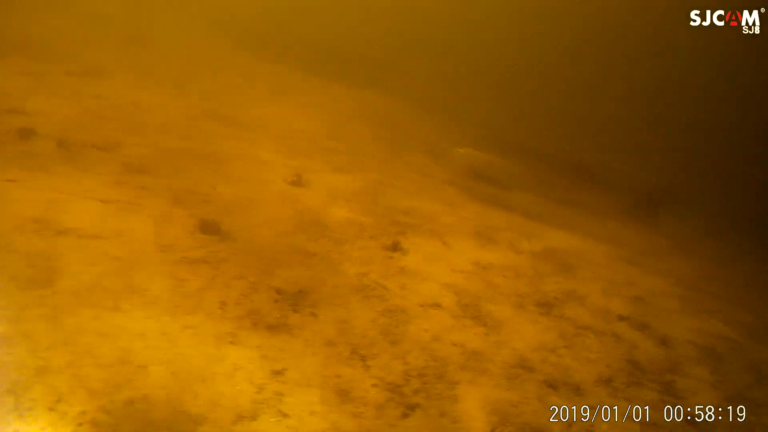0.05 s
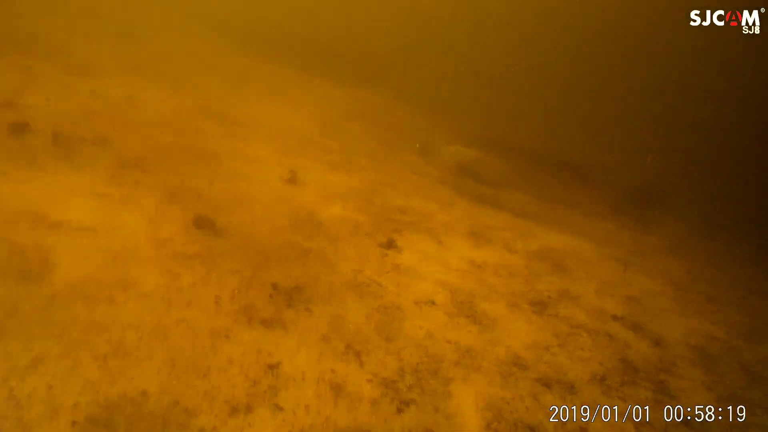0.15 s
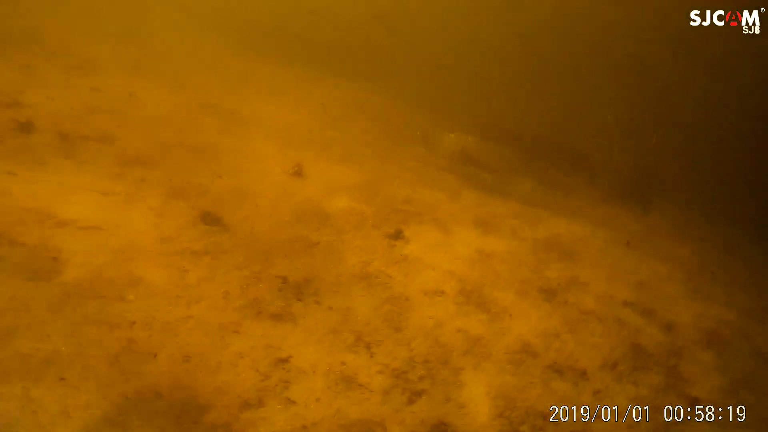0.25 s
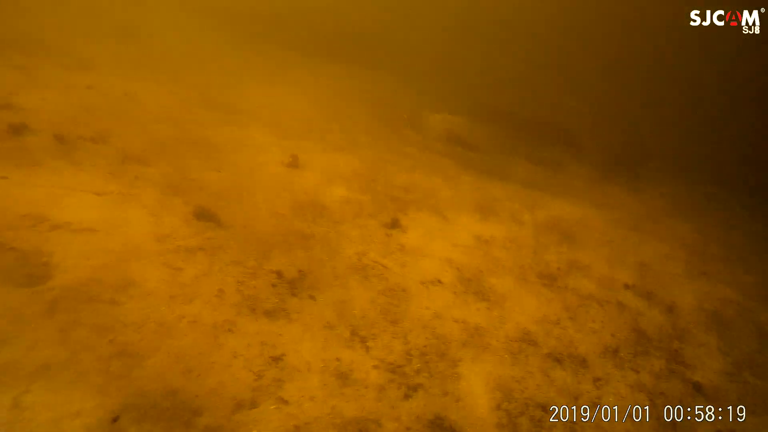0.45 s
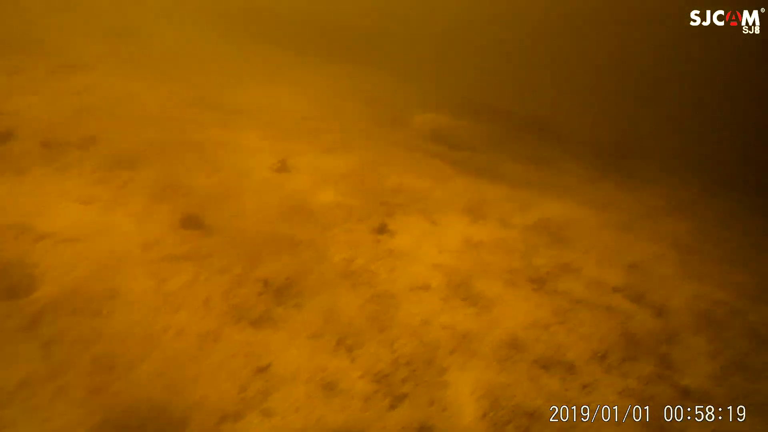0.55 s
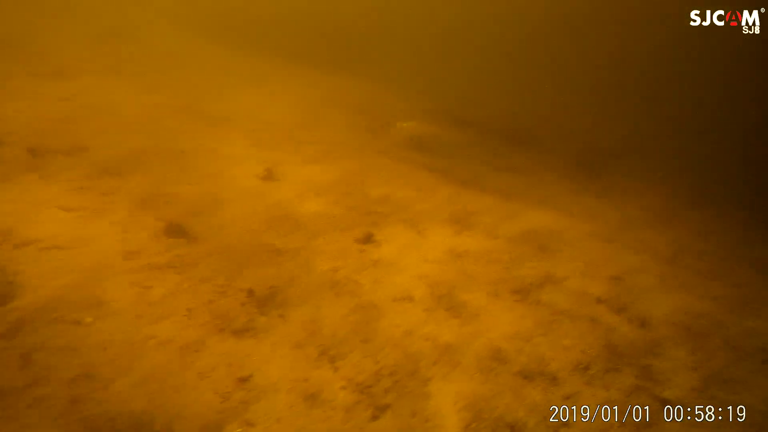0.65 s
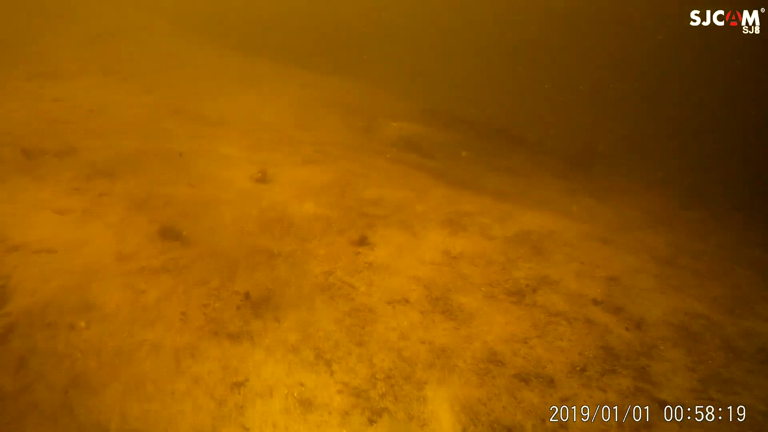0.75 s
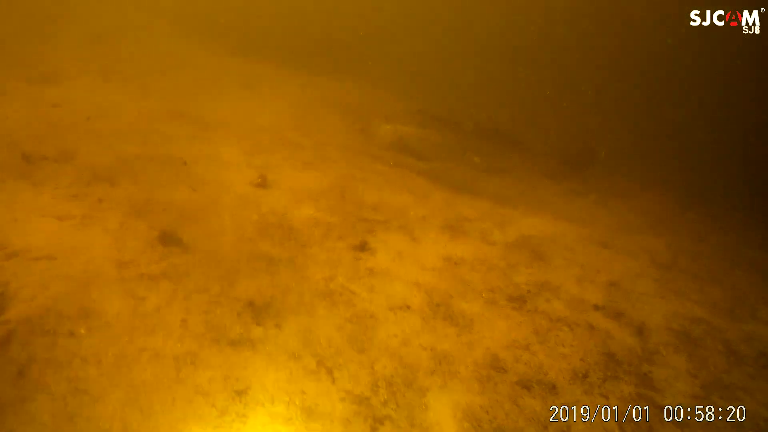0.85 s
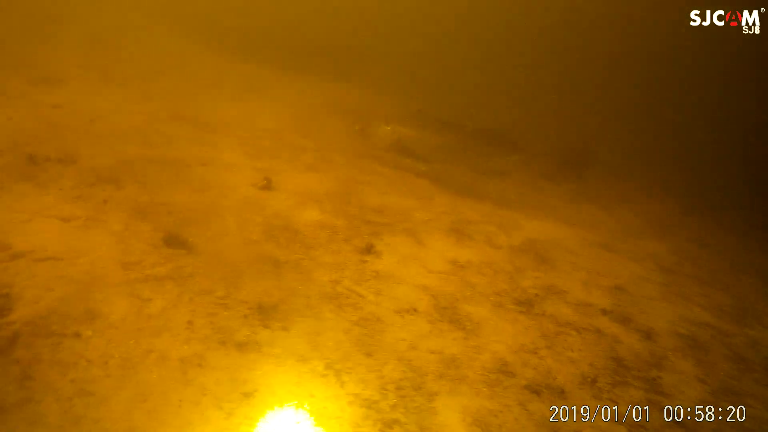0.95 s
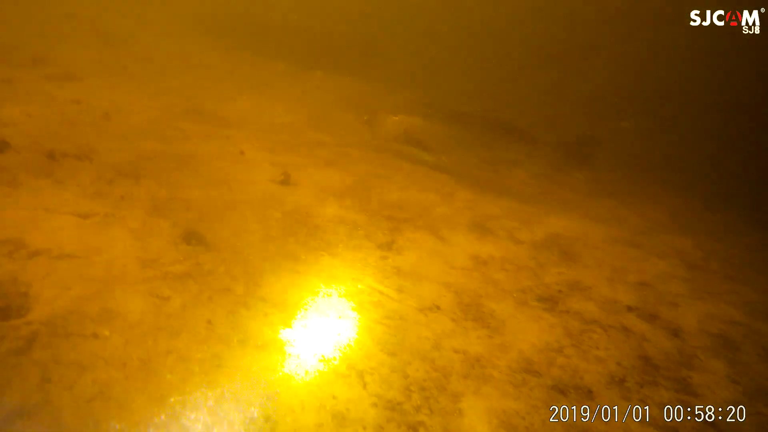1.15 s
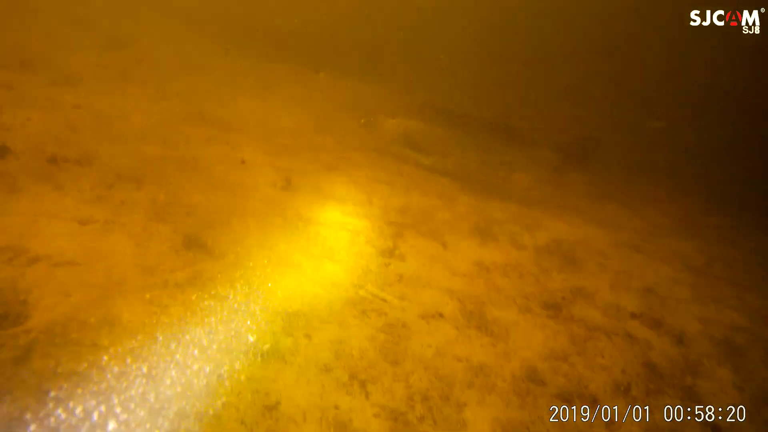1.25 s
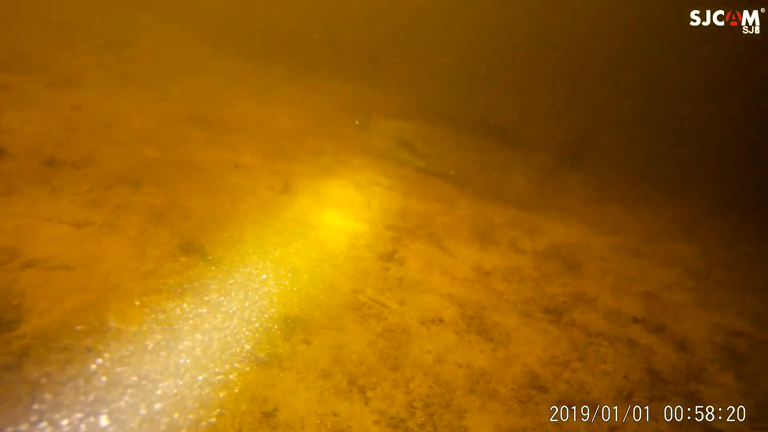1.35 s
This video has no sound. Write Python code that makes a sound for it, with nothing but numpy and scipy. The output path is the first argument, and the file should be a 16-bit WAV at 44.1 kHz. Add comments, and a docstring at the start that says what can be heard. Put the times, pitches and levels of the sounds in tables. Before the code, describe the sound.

One sharp, very loud knock strikes the plastic housing of an underwater camera at about 0.25 seconds, clipped and dying almost at once. Before it, faint muffled wash, hiss and soft low nudges, firmer near 0.18. Afterwards small thuds follow until about 0.5, where grit rustles briefly. Tiny bubbles plink sparsely, with low bloops near 0.9 and from 1.15 to 1.4, over dull rumble and a very thin high whine.

```python
"""A small camera in a plastic housing hangs under water, heard for 1.4 seconds. From the start water washes
dully (bands of noise), grit rustles in bursts, and the electronics hiss and whine. Soft nudges, pushes that
ring the housing's modes, set its lowest mode swaying before and after the knock. At a quarter second something
hard knocks the housing: very short, strong pushes that overload the recorder. At half a second a tiny tap ticks
on the housing. Then bubbles plink, mostly from half a second on: dying sines that rise in pitch, several of
them low near the end."""
import sys
import numpy as np
from scipy import signal
from scipy.io import wavfile

SR = 44100
rng = np.random.default_rng(int(sys.argv[2]) if len(sys.argv) > 2 else 0)


def waveform_to_disk(signal):
    """Save audio, clipped to [-1, 1], as 16-bit WAV at the path in sys.argv[1]."""
    frames = np.transpose(np.atleast_2d(signal))
    scaled = np.clip(frames, -1, 1) * 32767
    samples = np.round(scaled).astype(np.int16)
    wavfile.write(sys.argv[1], SR, samples)


def ratio_of_db(decibels):
    """Turn decibels (scalar or array-like) into linear amplitude factors; 0 dB maps to 1."""
    return 10 ** (np.asarray(decibels, float) / 20)


N = 61739  # length in samples

# Pushes on the housing. Each row: start in seconds, impulse in dB, length in ms, direction as +1 or -1.
HOUSING_PUSHES = [(.001, -30, 5.2, -1), (.180, -33, 2.2, -1), (.191, -33, 2.6, -1), (.246016, 0.9, .05, 1),
                  (.246117, -7.9, .08, -1), (.247592, -6.9, .149, -1), (.2913, -27, 5.0, 1),
                  (.372, -34, 5.4, -1), (.492, -34, 5.3, 1), (.510, -32, 5.3, -1), (.63, -43, 5.0, -1),
                  (.708, -48, .05, 1), (.73, -43, 5.0, -1)]
# Ringing modes of the housing. Each row: pitch in Hz, time to fall 60 dB in seconds,
# left gain in dB, right gain in dB, left direction as +1 or -1, right direction as +1 or -1.
HOUSING_MODES = [(92.0, 0.1302, -4.5, -7.2, -1.0, -1.0), (239.0, 0.0323, -3.6, -6.2, -1.0, -1.0),
                 (315.0, 0.0238, -2.8, -6.0, -1.0, -1.0), (435.0, 0.0285, -2.3, -5.7, -1.0, -1.0),
                 (538.0, 0.0577, -9.2, -10.5, 1.0, 1.0), (789.0, 0.0203, -6.7, -12.1, 1.0, 1.0),
                 (918.0, 0.0094, 4.6, 0.2, 1.0, 1.0), (1210.0, 0.016, 0.5, -6.3, -1.0, -1.0),
                 (1488.0, 0.0097, -8.1, -7.7, 1.0, 1.0), (2335.0, 0.008, -10.8, -19.8, -1.0, 1.0),
                 (3191.0, 0.0097, -21.9, -15.2, 1.0, -1.0), (4224.0, 0.0069, -17.1, -12.7, -1.0, -1.0),
                 (5055.0, 0.0038, -15.4, -12.0, 1.0, 1.0), (6953.0, 0.0067, -23.7, -24.9, -1.0, -1.0)]
# Bubbles, and a few very short ticks; the rows near .505 s are a tiny tap on the housing that rings its high
# modes. # Each row: start in seconds, level before fade-in and decay in dB, starting pitch in Hz, # time to
# fall 60 dB in seconds, left minus right in dB.
BUBBLES_AND_TICKS = [(.5053, -45, 5200, .004, -2), (.5052, -42, 2350, .012, -4), (.5378, -51, 1890, .03, -2),
                     (.5055, -43, 8000, .004, -2), (.273, -50, 8500, .004, 6), (.7873, -43, 2930, .015, -2),
                     (.8394, -49, 2420, .012, .1), (.961, -41, 2350, .012, .1), (1.0385, -41, 4000, .006, 2.5),
                     (1.064, -49, 2200, .012, .1), (1.0712, -41, 5000, .005, 2.5),
                     (1.082, -43, 12600, .003, .1), (1.0848, -46, 8200, .004, .1), (1.203, -44, 2800, .008, -6),
                     (1.2715, -41, 4730, .008, 5), (1.3315, -48, 3700, .005, .1), (1.337, -48.5, 1750, .02, .1),
                     (.71, -41, 430, .07, 3), (.885, -35.5, 395, .08, 3), (.886, -39.5, 860, 0.063, 4.5),
                     (1.14, -40, 168, .05, 3), (1.187, -40, 233, .07, 2.6), (1.235, -38, 334, 0.046, 3),
                     (1.308, -28.5, 170, .045, 3), (1.34, -40, 230, .04, 2.8), (1.374, -36, 270.3, .06, 3),
                     (1.375, -31, 835, 0.071, 4.8)]
# Changing strength of the wash. Each row: time in seconds, rumble level in dB, gurgle level in dB.
WASH_LEVELS = [(.0, -52, -49), (.06, -58, -53), (.13, -62, -57), (.165, -57, -54), (.185, -45, -46),
               (.22, -51, -49), (.3, -56, -51), (.34, -60, -56), (.47, -61, -56), (.55, -62, -54),
               (.6, -60, -56), (.63, -56, -54), (.73, -54, -49), (.78, -62, -54), (.82, -60, -53),
               (.92, -61, -53), (1.0, -56, -52), (1.1, -59, -54), (1.15, -51, -54), (1.35, -50, -53),
               (1.4, -48, -50)]
# Changing strength of the deep sway. Each row: time in seconds, level in dB.
SWAY_LEVELS = [(.0, -56), (.6, -58), (.7, -55), (.78, -63), (.95, -68), (1.1, -62), (1.15, -58), (1.4, -58)]
# Changing strength of the grit rustle. Each row: time in seconds, level in dB.
RUSTLE_LEVELS = [(.0, -61), (.05, -63), (.07, -76), (.14, -74), (.18, -57), (.215, -62), (.24, -70),
                 (.31, -68), (.34, -78), (.49, -78), (.51, -57), (.56, -56), (.575, -76), (.7, -69),
                 (.75, -76), (1.2, -72), (1.27, -67), (1.37, -68), (1.4, -52)]
# Tone colours of the deepest pressure, deep sway, rumble, gurgle, grit and hiss.
# Each row: frequency in Hz, relative strength in dB per Hz.
PRESSURE_COLOUR = [(14, -15), (22, -1), (40, -2), (62, -5), (80, -20)]
SWAY_COLOUR = [(50, -20), (65, -3), (95, -1), (130, -2), (160, -20)]
RUMBLE_COLOUR = [(65, -32), (110, -7), (237, -2.5), (296, -9.5), (380, -2.5), (490, -29.5), (840, -120)]
GURGLE_COLOUR = [(190, -29), (330, -9.5), (394, -7.5), (584, -5), (634, -2.5), (771, -7.5), (870, -1),
                 (1500, -30.5), (1950, -58), (3300, -120)]
GRIT_COLOUR = [(1100, -20), (1500, -5), (2300, -1), (3500, -5), (5000, -12), (8000, -17), (13000, -16),
               (15500, -25)]
HISS_COLOUR = [(710, -27), (1200, -2.5), (1290, -15), (1580, -6.5), (1960, -10), (2890, -5), (7640, -10),
               (11000, -8.5), (13800, -11), (15500, -25)]
# How alike the noise is on both sides. Each row: frequency in Hz, likeness from 0 to 1.
SIDE_LIKENESS = [(60, 0.96), (180, 0.97), (550, 1), (1650, 0.65), (4970, 0.084), (15000, 0.24)]
# Left-right balance of the noise. Each row: frequency in Hz, left minus right in dB.
SIDE_BALANCE = [(60, 2.5), (180, 2), (550, 4.0), (1650, 1.5), (4970, -0.5), (15000, 0.5)]

PRESSURE_DB, HISS_DB = -57, -60.5
WHINE_HZ, WHINE_WIDTH_HZ, WHINE_DB = 11075, 30, -72  # middle pitch, spread of its wander, middle level
BUBBLE_RISE_PER_S = 5.8  # pitch gained each second, as a multiple of the starting pitch
BUBBLE_ATTACK_CYCLES = .35  # time constant of the fade-in
HOUSING_CUT_HZ = 62  # pushes are weakened below this
CEILING, KNEE = 1.0, 20.0  # largest amplitude, and how sharply the ceiling sets in


def rms_one(x):
    """Scale to an average strength (rms) of 1."""
    return x / np.sqrt(np.mean(x ** 2) + 1e-20)


def at_hz(points, hz):
    """Read a table between its rows, on a log-frequency axis."""
    table_hz, values = np.array(points).T
    return np.interp(np.log(hz), np.log(table_hz), values)


def over_time(times, values):
    """Join timed values by straight lines, one value for each sample."""
    return np.interp(np.arange(N) / SR, times, values)


def drift(rate):
    """Smooth random wander with spread 1: white noise through two equal low-passes at rate Hz."""
    step = 40  # samples between computed points
    r = np.exp(-2 * step * np.pi * rate / SR)
    chance = rng.standard_normal(N // step + 2002)
    slow = signal.lfilter([1], [1, -2 * r, r * r], chance)[2000:]  # skip the filter's start-up
    return np.interp(np.arange(N) / step, np.arange(len(slow)), rms_one(slow))


def sides(pan_db):
    """Left and right gains that differ by pan_db."""
    return ratio_of_db(np.array([[.5], [-.5]]) * pan_db)


def noise(colour, patchy_db, rate):
    """Narrow bands of stereo noise, each with its own level, flicker and likeness; rms 1 overall."""
    together = drift(rate)  # flicker shared by all bands
    flickers = [drift(rate) for _ in range(16)]
    lowest, highest = colour[0][0], colour[-1][0]
    edges = np.geomspace(lowest, highest, 2 + int(3 * np.log2(highest / lowest)))  # about 3 per octave
    white = rng.standard_normal((2, 2, N + 8000))
    out = 0
    for k, (low, high) in enumerate(zip(edges, edges[1:])):
        band = signal.butter(3, [low, high], "band", fs=SR, output="sos")
        # neighbouring bands use different noise
        mid, side = signal.sosfilt(band, white[k % 2])[:, 8000:]
        hz = np.sqrt(low * high)
        alike = np.clip(at_hz(SIDE_LIKENESS, hz), 0, 1)
        stereo = np.sqrt(1 + alike) * mid + np.sqrt(1 - alike) * side * [[1], [-1]]
        gain = ratio_of_db(at_hz(colour, hz) + patchy_db * (0.58 * together + flickers[k]))
        out = out + gain * sides(at_hz(SIDE_BALANCE, hz)) * stereo
    return rms_one(out)


def electronics():
    """Broad noise makes the hiss; a sine wavering in pitch and strength makes the thin whine."""
    hiss = ratio_of_db(HISS_DB) * noise(HISS_COLOUR, patchy_db=1.6, rate=15.5)
    whine_level = ratio_of_db(WHINE_DB + 1.5 * drift(30.0))
    whine_hz = WHINE_HZ + WHINE_WIDTH_HZ * drift(40.0)
    whine = whine_level * np.sin(2 * np.pi * np.cumsum(whine_hz) / SR)
    return hiss + whine


def water():
    """Moving water as flickering noise: steady deep pressure, sway, rumble, gurgle and rustling grit."""
    times, rumble_db, gurgle_db = np.transpose(WASH_LEVELS)
    sway_level = ratio_of_db(over_time(*np.transpose(SWAY_LEVELS)))
    rumble_level = ratio_of_db(over_time(times, rumble_db))
    gurgle_level = ratio_of_db(over_time(times, gurgle_db))
    grit_level = ratio_of_db(over_time(*np.transpose(RUSTLE_LEVELS)))
    pressure = ratio_of_db(PRESSURE_DB) * noise(PRESSURE_COLOUR, patchy_db=2.5, rate=5.0)
    sway = sway_level * noise(SWAY_COLOUR, patchy_db=2.0, rate=6.0)
    rumble = rumble_level * noise(RUMBLE_COLOUR, patchy_db=3.5, rate=11.8)
    gurgle = gurgle_level * noise(GURGLE_COLOUR, patchy_db=2.0, rate=19.8)
    grit = grit_level * noise(GRIT_COLOUR, patchy_db=2.2, rate=60.0)
    return pressure + sway + rumble + gurgle + grit


def bubbles():
    """Each bubble or tick is a dying sine that rises in pitch."""
    out = 0
    for start, db, hz, t60, pan_db in BUBBLES_AND_TICKS:
        t = np.clip(np.arange(N) / SR - start, 0, 1)
        fade_in = 1 - np.exp(-t * hz / BUBBLE_ATTACK_CYCLES)
        decay = ratio_of_db(db - 60 * t / t60)
        tone = np.sin(2 * np.pi * hz * (t + BUBBLE_RISE_PER_S * t * t / 2))
        out = out + sides(pan_db) * fade_in * decay * tone
    return out


def housing():
    """Every contact is a half-sine push that drives all modes; long pushes reach only the low ones."""
    t = np.arange(N) / SR
    force = 1e-18
    for start, db, ms, way in HOUSING_PUSHES:
        push = np.sin(np.pi * np.clip((t - start) * 1000 / ms, 0, 1))
        # dividing by the length keeps the impulse the same for short and long pushes
        force = force + np.sign(way) * ratio_of_db(db) * push * np.pi * 500 / (ms * SR)
    low_cut = signal.butter(2, HOUSING_CUT_HZ, "high", fs=SR, output="sos")
    force = signal.sosfilt(low_cut, force)
    out = 0
    for hz, t60, left_db, right_db, *direction in HOUSING_MODES:
        r = ratio_of_db(-60 / (t60 * SR))  # loss per sample
        w = 2 * np.pi * hz / SR  # turn per sample
        ring = signal.lfilter([0, np.sin(w)], [1, -2 * r * np.cos(w), r * r], force)
        gains = np.sign(direction) * ratio_of_db(np.array([left_db, right_db]))
        out = out + gains[:, None] * ring
    return out


def scene():
    """All sources added together at the two microphones."""
    return electronics() + water() + bubbles() + housing()


def band_limit(x):
    """A steep low-pass at the top of the band."""
    return signal.sosfilt(signal.butter(12, 15630, fs=SR, output="sos"), x)


def record(dry):
    """The knock hits the converter's ceiling, which flattens the highest peaks."""
    mix = dry / (1 + np.abs(dry / CEILING) ** KNEE) ** (1 / KNEE)
    return band_limit(mix)


dry = scene()
out = record(dry)
waveform_to_disk(out)
```